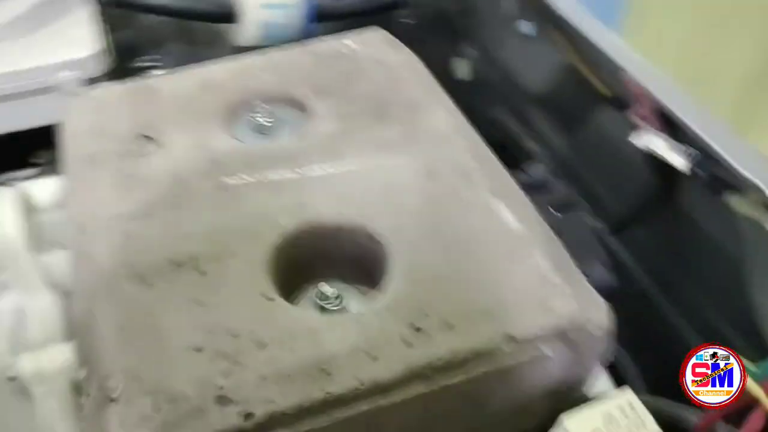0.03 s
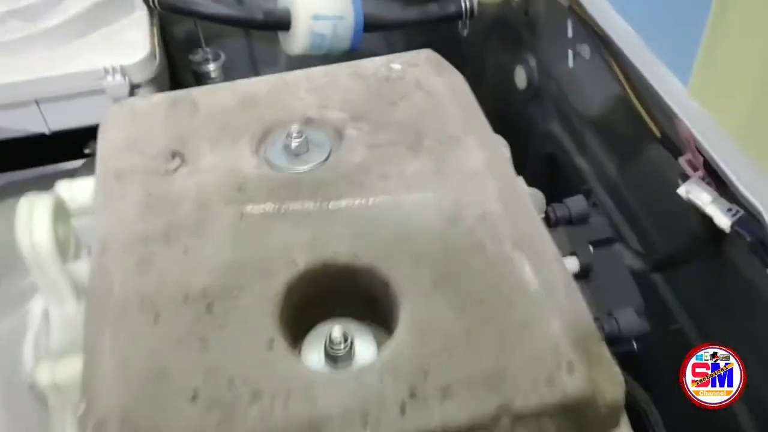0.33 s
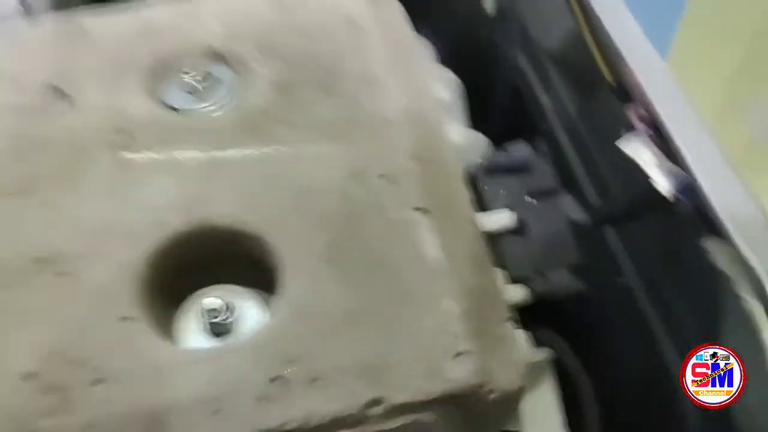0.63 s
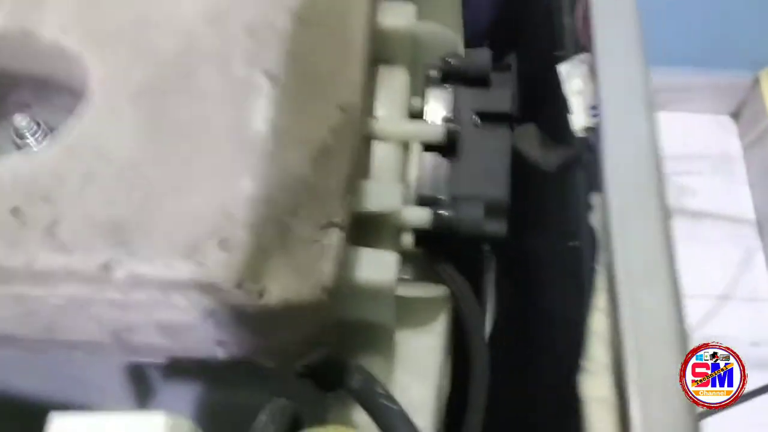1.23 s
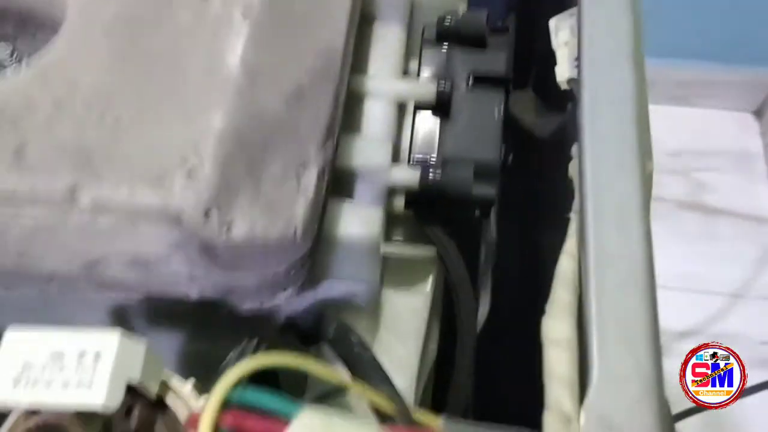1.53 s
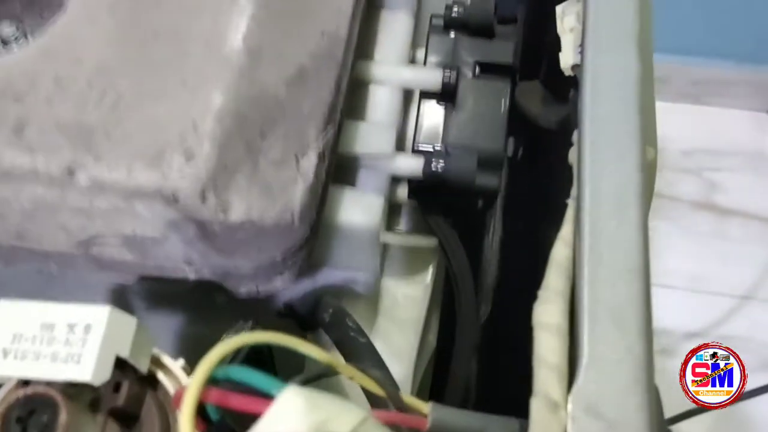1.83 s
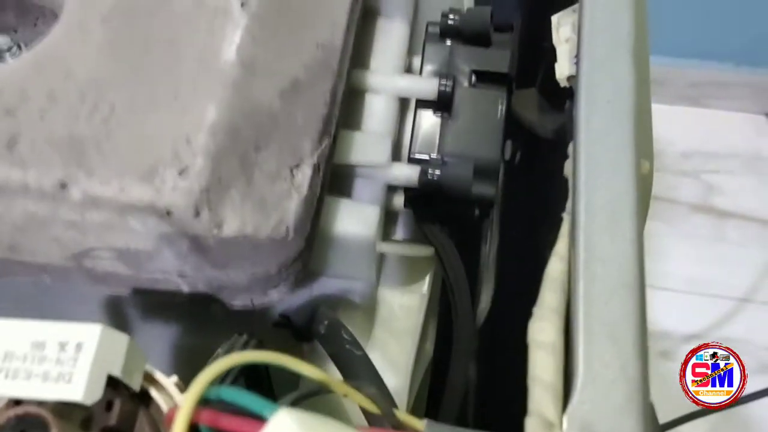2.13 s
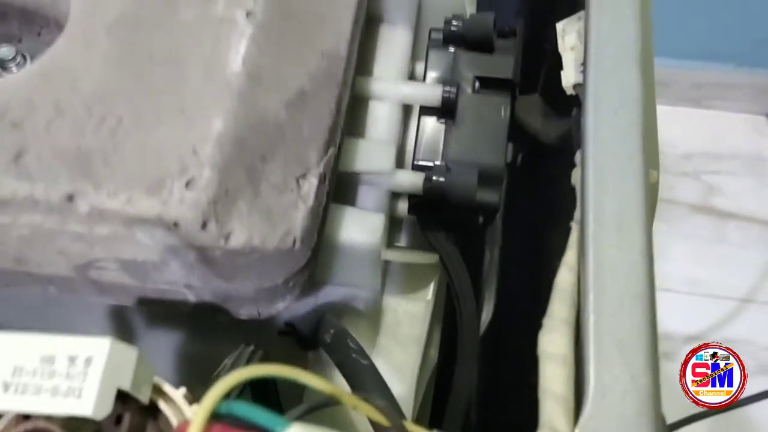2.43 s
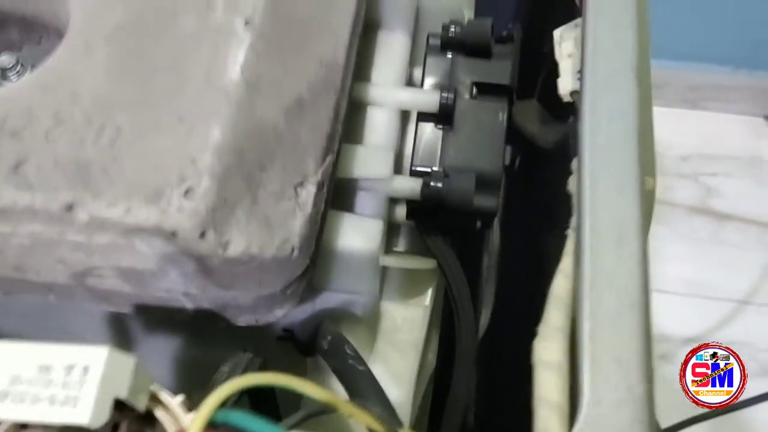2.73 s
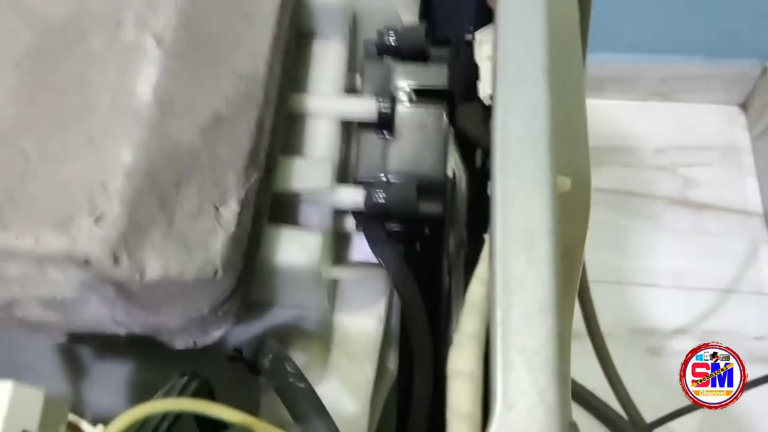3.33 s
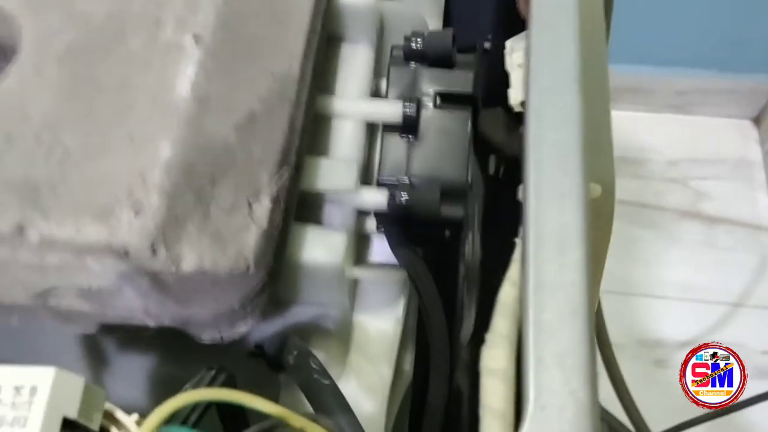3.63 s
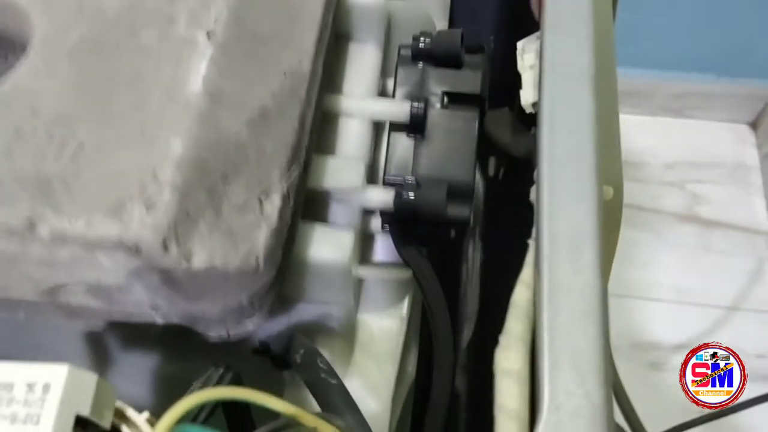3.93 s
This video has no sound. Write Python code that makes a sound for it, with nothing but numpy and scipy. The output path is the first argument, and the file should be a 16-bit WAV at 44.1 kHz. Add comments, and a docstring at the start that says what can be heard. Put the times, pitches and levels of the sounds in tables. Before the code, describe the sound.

A washing machine spins at full speed, rumbling and knocking under a high motor whine.

```python
"""An open washing machine spins at full speed, heard from just above its concrete counterweight.
The drum knocks and squeaks on every turn and makes the tub boom, over a surging rumble and panel clatter.
The brush motor whines on multiples of its shaft rate over the hiss of its brushes, which squeal at times.
The microphone moves along the machine for the first 1.5 s: the boom softens and the whines trade places."""
import sys
import numpy as np
from scipy import signal
from scipy.fft import rfft, irfft
from scipy.io import wavfile

SR = 44100
rng = np.random.default_rng(int(sys.argv[2]) if len(sys.argv) > 2 else 0)


def wav_record(signal):
    """Record a signal, one row per channel, as 16-bit PCM in the file named by sys.argv[1]."""
    frames = np.transpose(np.atleast_2d(signal))
    bounded = np.clip(frames, -1, 1)
    # unit amplitude maps onto the largest positive 16-bit level
    quanta = np.round(bounded * 32767).astype(np.int16)
    wavfile.write(sys.argv[1], SR, quanta)


N = 176400
TIME = np.arange(N) / SR
DRUM_HZ, MOTOR_HZ, MAINS_BUZZ_HZ = 16.46, 169.2, 100
BASS_CORRELATION, TREBLE_CORRELATION = 0.93, 0.18   # left to right
BASS_SURGE_DB, RUMBLE_KNOCK_DEPTH = 4, 0.14


def from_db(db):
    """Decibels to gain."""
    return 10 ** (np.asarray(db) / 20)


def curves(rows):
    """Breakpoint columns, interpolated per sample."""
    times_s, *columns = np.transpose(rows)
    return [np.interp(TIME, times_s, column) for column in columns]


def unit_rms(x):
    """Scale to rms 1."""
    return x / np.sqrt(np.mean(x ** 2))


def bell(offset_s, sigma_s):
    """Gaussian envelope, peak 1."""
    return np.exp(-.5 * (offset_s / sigma_s) ** 2)


def drift(rate_hz):
    """Slow random wander, standard deviation 1."""
    hop, warmup = 40, 2000
    pole = np.exp(-2 * np.pi * rate_hz * hop / SR)
    white = rng.standard_normal(N // hop + warmup + 2)
    slow = signal.lfilter([1], [1, -2 * pole, pole * pole], white)[warmup:]
    return np.interp(np.arange(N) / hop, np.arange(len(slow)), slow / slow.std())


def flicker(spread_db, rate_hz):
    """Randomly wavering gain, rms 1."""
    return unit_rms(from_db(spread_db * drift(rate_hz)))


def tone(phase, flutter, rate_hz):
    """Partial fluttering in level and phase, rms about 1."""
    in_phase = (1 + flutter * drift(rate_hz)) * np.cos(phase)
    quadrature = flutter * drift(rate_hz) * np.sin(phase)
    return (in_phase + quadrature) * np.sqrt(2 / (1 + 2 * flutter ** 2))


def panned(x, pan_db):
    """Stereo pair, left over right by pan_db, mean unchanged."""
    left = from_db(pan_db)
    return np.array([x * left, x]) * 2 / (1 + left)


def noise_band(spectrum, low_hz, high_hz, correlation, repeat=0):
    """Band of shaped stereo noise; the share `repeat` recurs each shaft turn."""
    hz, *sides_db = np.transpose(spectrum)
    bins_hz = np.maximum(np.arange(N // 2 + 1) * SR / N, 1)
    shape = from_db([np.interp(np.log(bins_hz), np.log(hz), db) for db in sides_db])
    comb = np.sqrt(1 - repeat ** 2) / (1 - repeat * np.exp(-2j * np.pi * bins_hz / MOTOR_HZ))
    in_band = (bins_hz > low_hz) & (bins_hz <= high_hz)
    white = rng.standard_normal((3, N))
    pair = np.sqrt(correlation) * white[2] + np.sqrt(1 - correlation) * white[:2]
    return irfft(rfft(pair) * shape * comb * in_band, N) * np.sqrt(SR / 2)


def settled(midpoint_s=1.3, ease_s=0.103):
    """0 to 1 as the microphone comes to rest."""
    return .5 + .5 * np.tanh((TIME - midpoint_s) / ease_s)


def surge(depth_db, rate_hz=2.564, peak_s=0.085):
    """Gain that swells and sinks about two and a half times a second."""
    sway = np.cos(2 * np.pi * rate_hz * (TIME - peak_s)) + 0.23 * drift(3.7)
    return unit_rms(from_db(depth_db * sway))


def knocking(depth, knocks, sharpness=4.6):
    """Gain that rises at the given knocks of each drum turn."""
    bumps = sum(strength * np.exp(sharpness * (np.cos(2 * np.pi * (DRUM_HZ * TIME - turn)) - 1))
                for turn, strength in knocks)
    return unit_rms(1 + depth * (bumps / bumps.mean() - 1))


# Tub vibration. Each row: multiple of the drum rate, relative level in dB.
TUB_PARTIALS = [(7, -54), (9, -54), (12, -53), (13, -54), (15, -50), (16, -40), (17, -49), (19, -45),
                (20, -36), (21, -35), (23, -42), (24, -45), (25, -40), (27, -50), (30, -49), (32, -52),
                (33, -52), (37, -53), (38, -53), (40, -56)]
def tub_tones(low_hz, high_hz, knocks):
    """Drum harmonics in one band, phased by the knocks that drive them."""
    tones = 0
    for order, db in TUB_PARTIALS:
        if low_hz < order * DRUM_HZ <= high_hz:
            drive = sum(strength * np.exp(-2j * np.pi * order * turn) for turn, strength in knocks)
            phase = 2 * np.pi * order * DRUM_HZ * TIME + np.angle(drive)
            tones += from_db(db) * tone(phase, flutter=.25, rate_hz=2.9)
    return tones


def boom(levels, low_hz, high_hz, roughness):
    """One register of the tub: chugging tones and irregular shaking under one level curve."""
    tones = tub_tones(low_hz, high_hz, DRUM_KNOCKS)
    shaking = noise_band(RUMBLE_SPECTRUM, low_hz, high_hz, BASS_CORRELATION)
    shaking *= knocking(RUMBLE_KNOCK_DEPTH, DRUM_KNOCKS) / shaking.std(axis=1, keepdims=True)
    blend = (tones / tones.std() + roughness * shaking) / np.hypot(1, roughness)
    return from_db(curves(levels)) * blend


# Drum knocks. Each row: position in turns, relative strength.
DRUM_KNOCKS = [(.106, 1), (.322, .23), (.484, .88)]
# Lower and upper boom. Each row: time in seconds, left level in dB, right level in dB.
LOW_BOOM_LEVELS = [(0.0, -26.5, -26), (.9, -35, -24), (1.5, -47, -26.5), (4.0, -48, -29)]
HIGH_BOOM_LEVELS = [(.3, -42, -40), (.65, -41, -28.5), (1.65, -55, -32.5), (2.2, -44, -31), (4.0, -51, -31)]
def drum():
    """Knocks drive the tub: surging bass, a boom near 340 Hz, a growl above it."""
    bass = tub_tones(0, 230, DRUM_KNOCKS) * from_db(-1.5)
    growl = tub_tones(460, 780, PANEL_RATTLES[:1]) * from_db(1)
    booming = boom(LOW_BOOM_LEVELS, 230, 365, roughness=.45)
    booming += boom(HIGH_BOOM_LEVELS, 365, 460, roughness=1)
    return panned(bass * surge(BASS_SURGE_DB), pan_db=-10) + booming * surge(depth_db=1.37) + growl


# Tub and cabinet noise. Each row: frequency in Hz, left and right relative density in dB.
RUMBLE_SPECTRUM = [(25, -86, -85), (80, -79, -75), (150, -74, -64), (220, -75, -67), (340, -64, -54),
                   (400, -67, -56), (460, -71, -65), (560, -68, -68), (660, -73, -71), (780, -86, -83)]
def rumble():
    """Irregular shaking below and above the boom, pulsing with the knocks and rattles."""
    deep, bass, growl = [noise_band(RUMBLE_SPECTRUM, *band_hz, BASS_CORRELATION)
                         for band_hz in ((12, 90), (90, 230), (460, 780))]
    bass *= surge(BASS_SURGE_DB) * knocking(RUMBLE_KNOCK_DEPTH, DRUM_KNOCKS)
    growl *= flicker(spread_db=4, rate_hz=6.8) * knocking(0.22, PANEL_RATTLES)
    return from_db(2.6) * (deep + bass) + from_db(3) * growl


# Loose panels answering the knocks. Each row: position in turns, relative strength.
PANEL_RATTLES = [(.36, 1), (.68, 0.46)]
def clatter():
    """Loose cabinet parts chatter in step with the drum."""
    low, middle, high = [
        noise_band(HISS_SPECTRUM, *band_hz, TREBLE_CORRELATION) * flicker(spread_db=3.5, rate_hz=8)
        for band_hz in ((780, 1150), (1150, 1700), (1700, 2350))]
    return from_db(1) * (low + middle) * knocking(0.21, PANEL_RATTLES) + high


# Clatter, brush and air noise. Each row: frequency in Hz, left and right relative density in dB.
HISS_SPECTRUM = [(780, -86, -84), (1000, -71, -73), (1600, -75, -72), (1950, -84, -80), (2250, -79, -81),
                 (2450, -67, -79), (3100, -65, -76), (3500, -67, -91), (4200, -70, -83), (4650, -83, -95),
                 (5200, -70, -78), (6200, -63, -78), (6700, -59, -73), (7300, -64, -82), (8000, -67, -70),
                 (9200, -73, -76), (10300, -75, -80), (12800, -71, -91), (14800, -77, -87)]
def brushes(shaft_phase, bearing_order=11):
    """Brush hiss, pulsing with the shaft, the bearing and the mains."""
    low, middle, bright, top = [
        noise_band(HISS_SPECTRUM, *band_hz, TREBLE_CORRELATION, repeat=0.12)
        * flicker(spread_db=1.53, rate_hz=14)
        for band_hz in ((2350, 4650), (4650, 7100), (7100, 9500), (9500, 16000))]
    bright *= from_db(3 * (1 - settled()))
    top *= unit_rms(from_db(-5.5 * np.exp(-(TIME / 0.46) ** 10)))   # duller for the first 0.46 s
    pulsing = (1 + 0.11 * (np.cos(shaft_phase) + np.cos(2 * shaft_phase))
               + 0.067 * np.cos(2 * np.pi * bearing_order * DRUM_HZ * TIME)
               + 0.12 * np.cos(2 * np.pi * MAINS_BUZZ_HZ * TIME))
    return from_db(-0.27) * (low + middle + bright + top) * pulsing


def whine(shaft_phase, order, below_hz=0):
    """One motor partial, throbbing as the tub shakes, panned like the hiss at its pitch."""
    hz, left_db, right_db = np.transpose(HISS_SPECTRUM)
    pan_db = np.interp(order * MOTOR_HZ, hz, left_db - right_db)
    throb = 1 + 0.3 * np.cos(2 * np.pi * (DRUM_HZ * TIME + rng.random()))
    phase = order * shaft_phase - 2 * np.pi * below_hz * TIME
    sides = [tone(phase + 2 * np.pi * rng.random(), flutter=0.23, rate_hz=20) for _ in range(2)]
    return panned(throb, pan_db) * sides


# Steady motor tones. Each row: multiple of the shaft rate, relative level in dB.
MOTOR_PARTIALS = [(1, -48), (8, -54), (16, -51), (17, -50), (20, -50), (24, -52), (35, -48), (38, -50),
                  (39, -51), (40, -48), (41, -44), (42, -50), (52, -48), (56, -49), (64, -48), (78, -51)]
def motor(shaft_phase):
    """Armature slots and commutator bars whine on shaft harmonics."""
    return from_db(0.5) * sum(from_db(db) * whine(shaft_phase, order) for order, db in MOTOR_PARTIALS)


# Position-dependent whines. Each row: multiple of the shaft rate, relative level in dB at first
# and at rest, lift at the gap in dB.
SHIFTING_WHINES = [(18, -45, -40.5, 6), (36, -45, -46, 6), (43, -44, -53, 0), (44, -43, -52, 0),
                   (72, -50, -45, 1)]
def shifting_whines(shaft_phase, gap_s=0.91):
    """Motor whines trade places as the microphone passes a gap and settles."""
    at_gap = bell(TIME - gap_s, sigma_s=0.073)
    orders, gains = [], []
    for order, first_db, rest_db, lift_db in SHIFTING_WHINES:
        orders.append(order)
        gains.append(from_db(first_db + (rest_db - first_db) * settled() + lift_db * at_gap))
    whines = sum(gain * whine(shaft_phase, order) for order, gain in zip(orders, gains))
    mains_sideband = gains[0] * whine(shaft_phase, orders[0], below_hz=MAINS_BUZZ_HZ)
    return from_db(1.5) * whines + mains_sideband


# Motor ring. Each row: multiple of the shaft rate, relative level in dB.
RING_PARTIALS = [(47, -1), (48, 0), (49, -5)]
# Ring envelope. Each row: time in seconds, gain in dB.
RING_LEVELS = [(1.0, -43), (1.75, -38), (2.9, -37), (3.1, -45), (3.7, -38)]
def motor_ring(shaft_phase):
    """The motor rings near 8 kHz on three adjacent shaft harmonics."""
    partials = sum(from_db(db) * whine(shaft_phase, order) for order, db in RING_PARTIALS)
    return panned(from_db(curves(RING_LEVELS)[0]), pan_db=-7) * partials


# Squeak envelope. Each row: time in seconds, level in dB.
SQUEAK_LEVELS = [(0.0, -49), (.4, -30.5), (1.0, -38), (1.5, -36.5), (3.7, -29)]
def tub_squeaks(at_turn=0.755, pitch_hz=5284, rise_hz=235.4):
    """The tub rubs once a turn: a dry squeak, slightly higher once the microphone rests."""
    offset_s = ((DRUM_HZ * TIME - at_turn + .5) % 1 - .5) / DRUM_HZ
    envelope = bell(offset_s, sigma_s=0.0015) * from_db(curves(SQUEAK_LEVELS)[0])
    hz = pitch_hz + rise_hz * settled() + 40 * drift(28.7)
    return panned(envelope * np.sin(2 * np.pi * np.cumsum(hz) / SR), pan_db=22)


# Brush squeals. Each row: peak time in seconds, multiple of the shaft rate, relative level in dB.
BRUSH_SQUEALS = [(.59, 56, -43), (.70, 36, -37), (.80, 36, -36), (.97, 36, -38), (.98, 56, -44),
                 (1.18, 36, -35), (1.245, 36, -36), (1.315, 36, -37), (2.95, 56, -45), (3.45, 56, -44),
                 (3.61, 56, -44), (3.77, 36, -40)]
def brush_squeals(shaft_phase):
    """The brushes squeal briefly on single shaft harmonics."""
    return sum(from_db(db + 6) * bell(TIME - peak_s, sigma_s=0.019) * whine(shaft_phase, order)
               for peak_s, order, db in BRUSH_SQUEALS)


def scene(left_lag_s=.00031):
    """The motor holds its speed, shaken slightly by the drum; the tub reaches the right side first."""
    shaft_hz = MOTOR_HZ + 0.0603 * drift(2.327) + 0.14 * np.sin(2 * np.pi * DRUM_HZ * TIME)
    shaft_phase = 2 * np.pi * np.cumsum(shaft_hz) / SR
    left, right = drum() + rumble()
    tub = np.array([np.interp(TIME - left_lag_s, TIME, left), right])
    return (tub + clatter() + brushes(shaft_phase) + motor(shaft_phase) + shifting_whines(shaft_phase)
            + motor_ring(shaft_phase) + tub_squeaks() + brush_squeals(shaft_phase))


def record(dry):
    """Steep elliptic low-pass."""
    cutoff_hz = 15200
    return signal.sosfilt(signal.ellip(12, .1, 90, cutoff_hz, fs=SR, output="sos"), dry)


dry = scene()
out = record(dry)
wav_record(out)
```